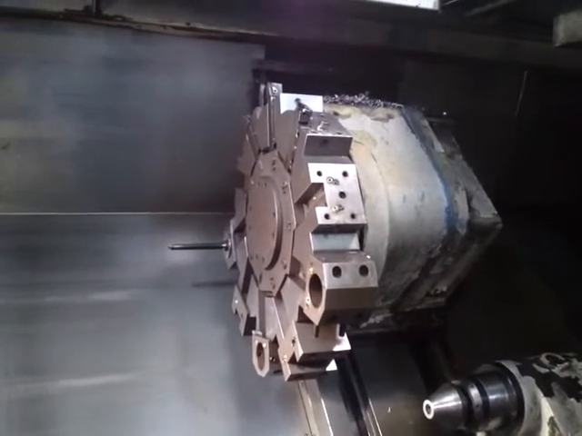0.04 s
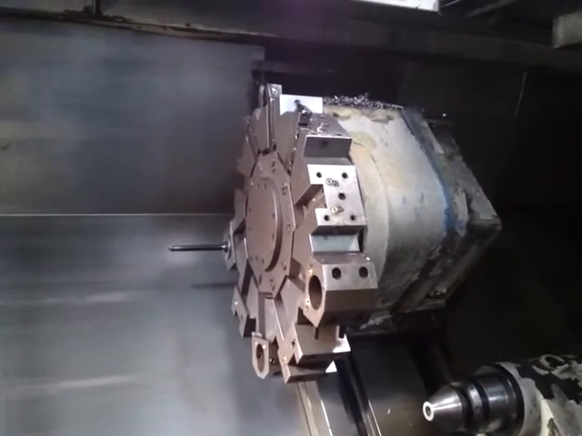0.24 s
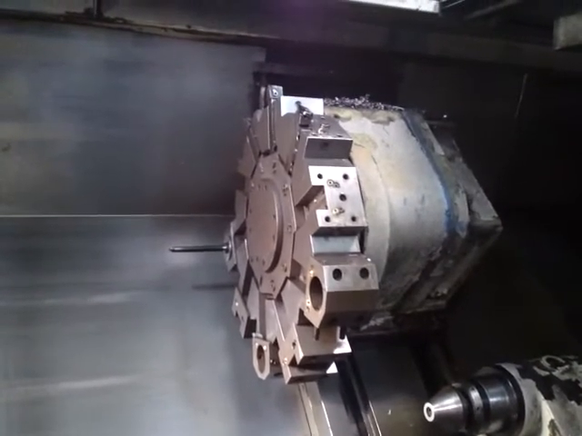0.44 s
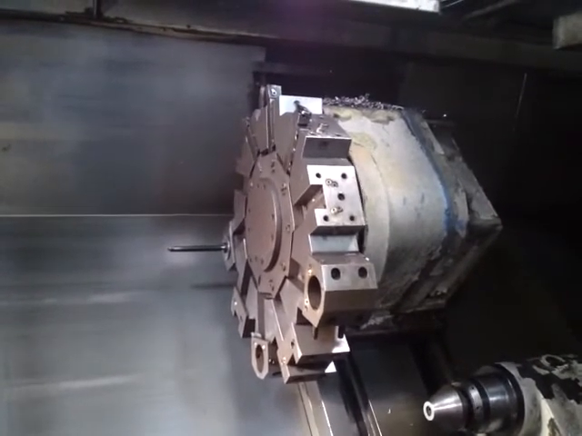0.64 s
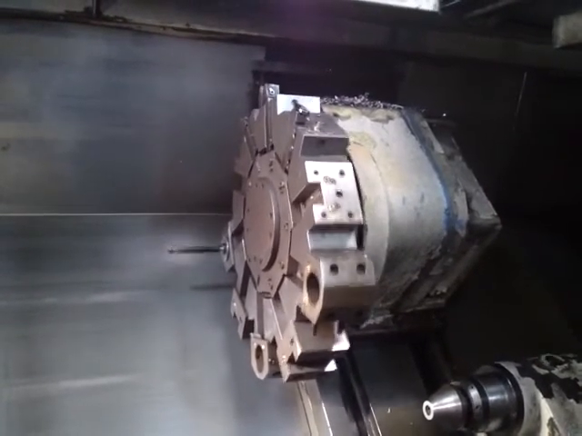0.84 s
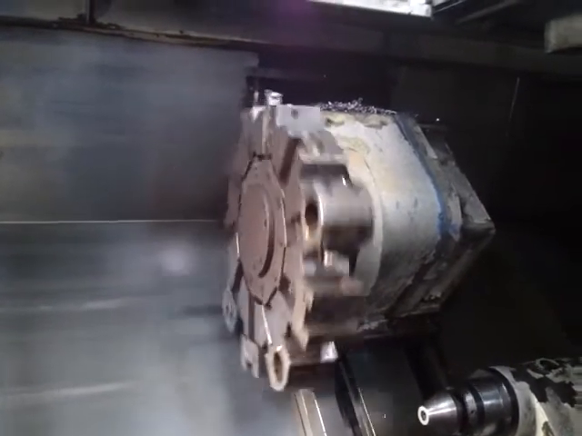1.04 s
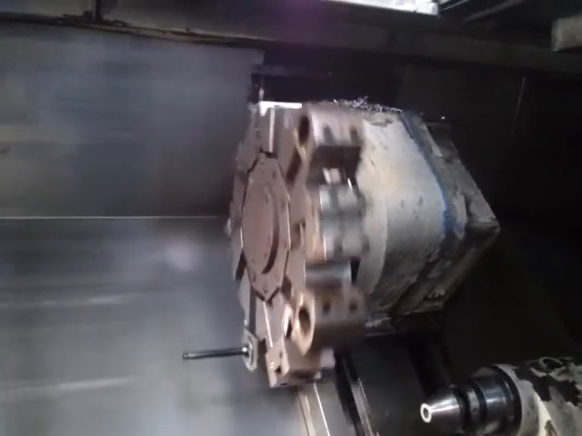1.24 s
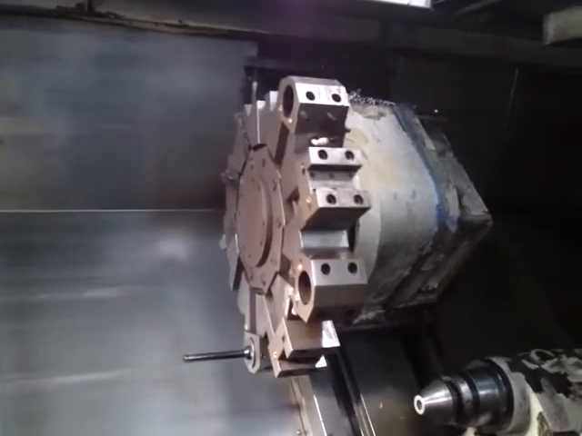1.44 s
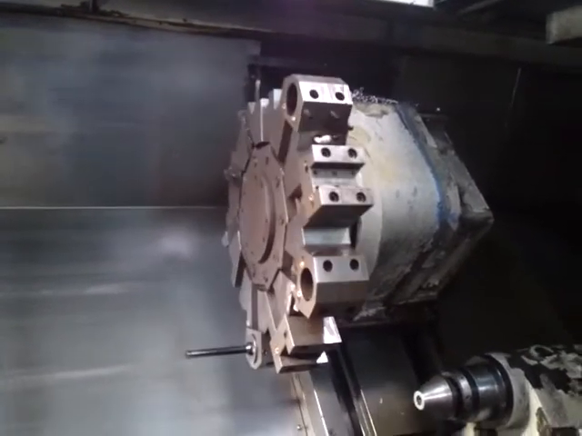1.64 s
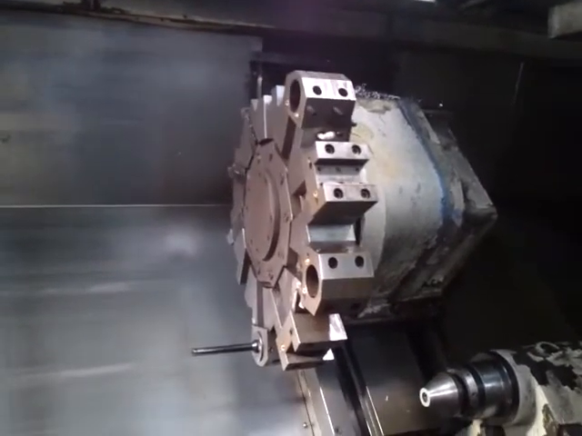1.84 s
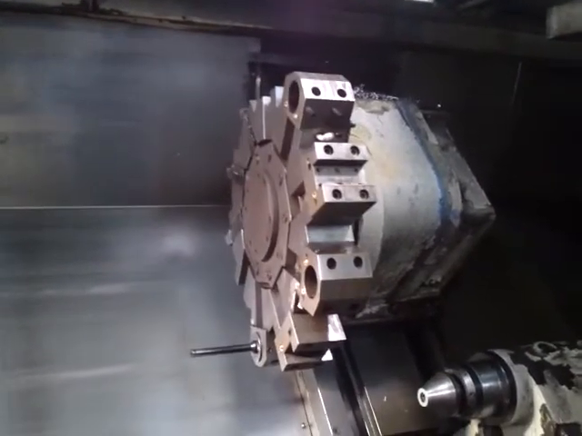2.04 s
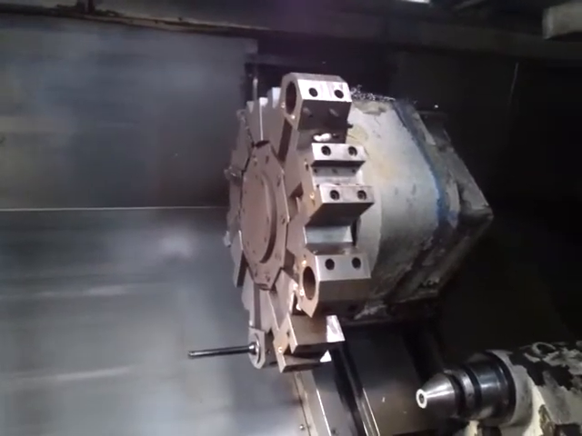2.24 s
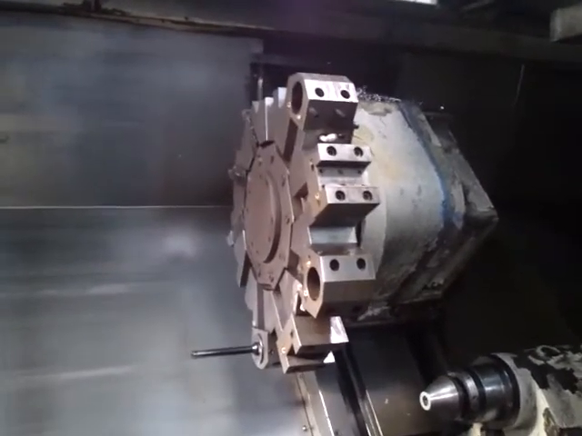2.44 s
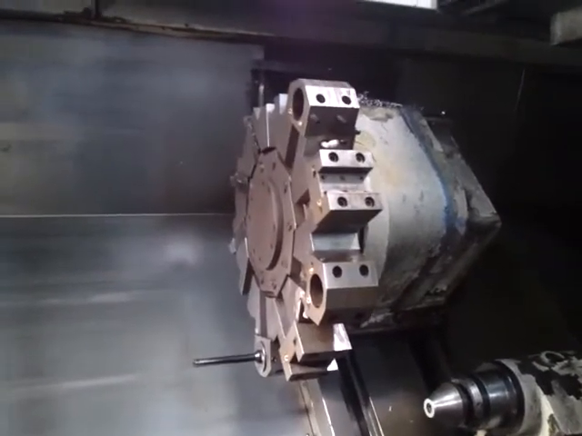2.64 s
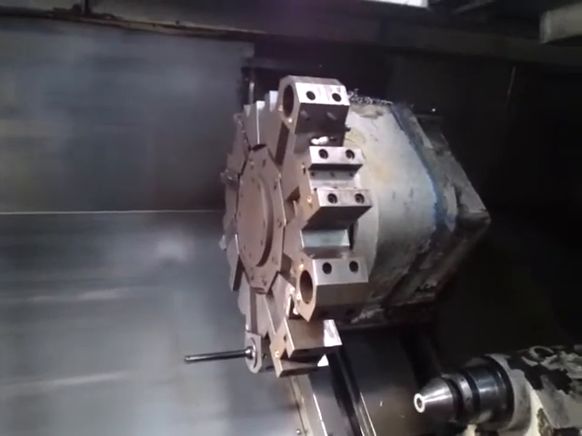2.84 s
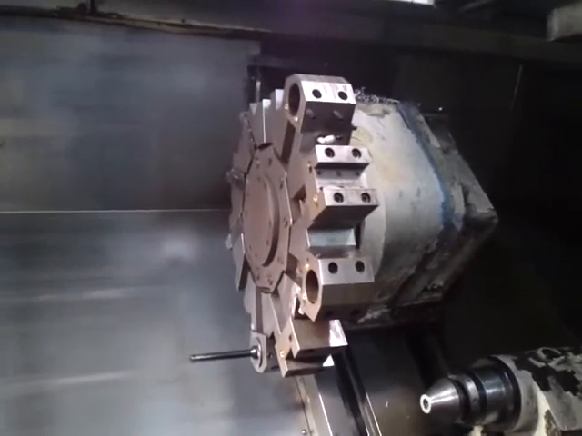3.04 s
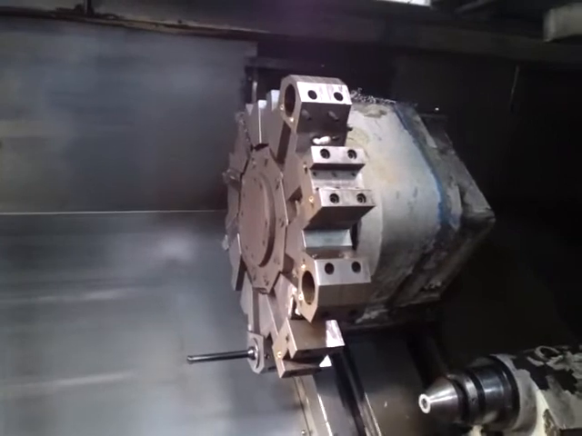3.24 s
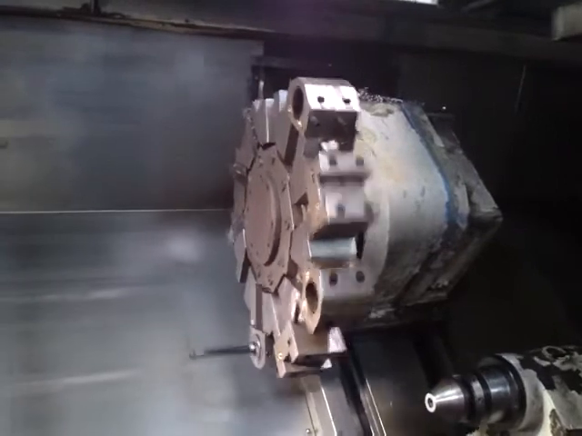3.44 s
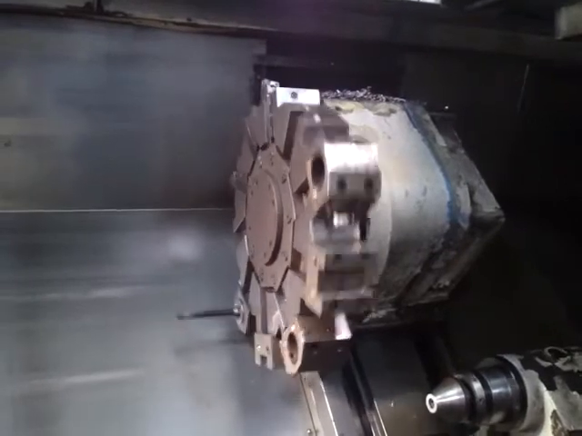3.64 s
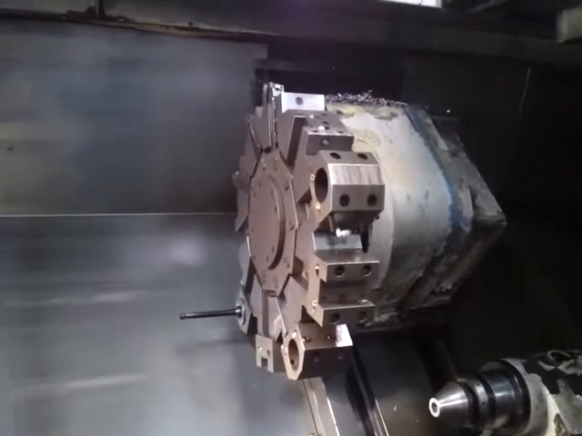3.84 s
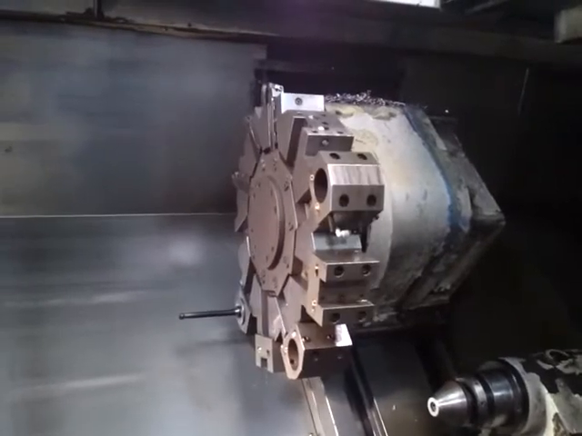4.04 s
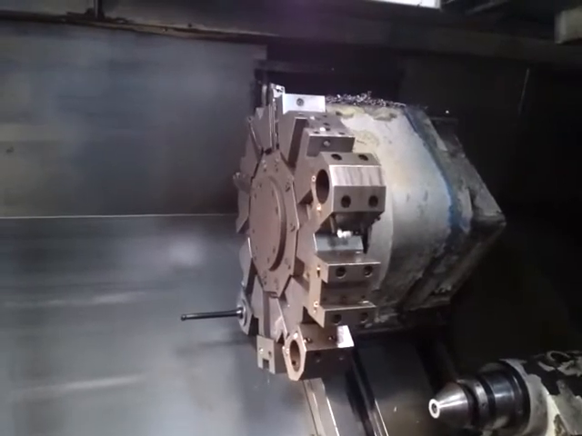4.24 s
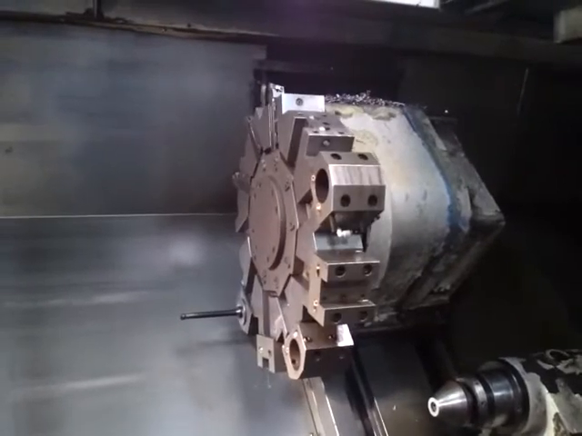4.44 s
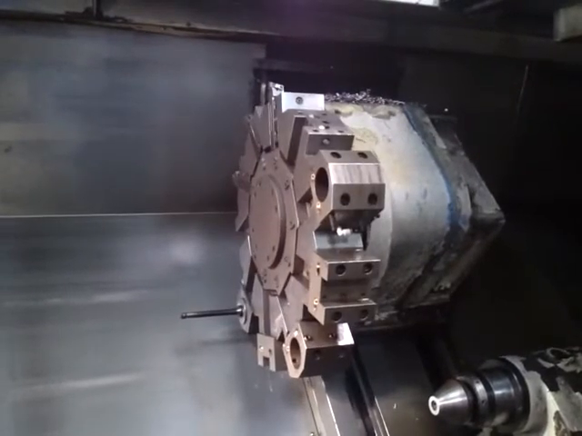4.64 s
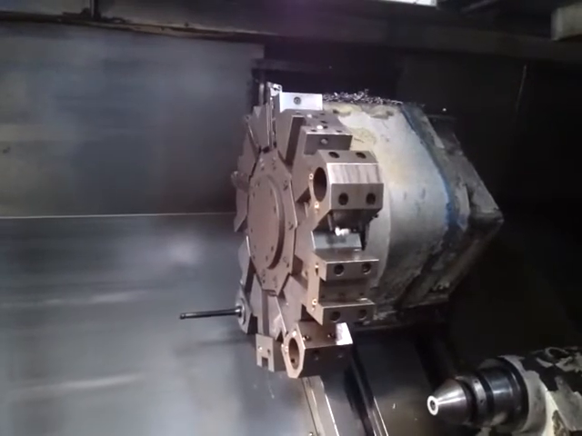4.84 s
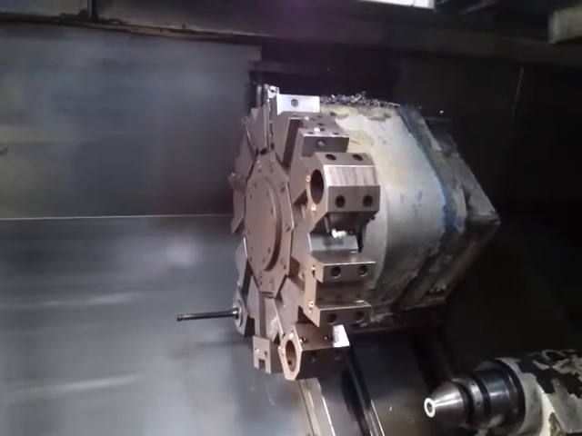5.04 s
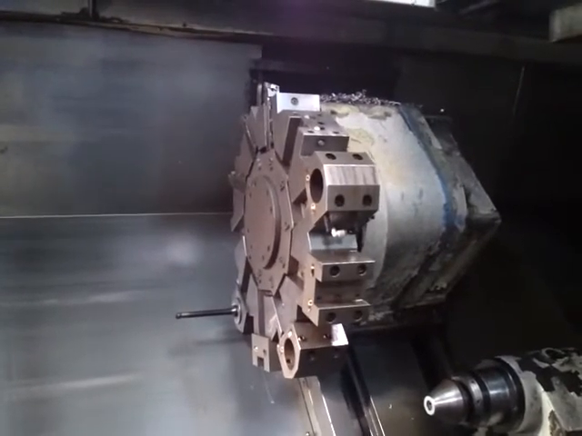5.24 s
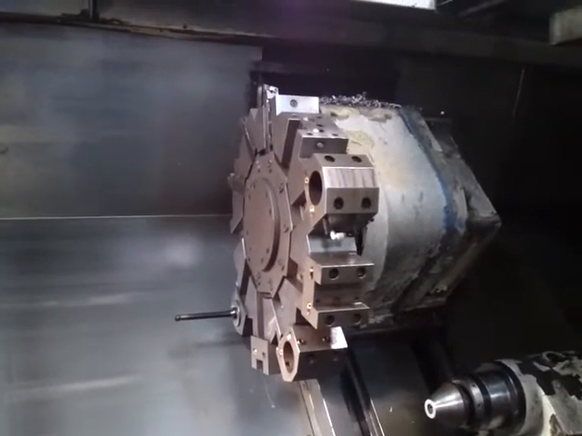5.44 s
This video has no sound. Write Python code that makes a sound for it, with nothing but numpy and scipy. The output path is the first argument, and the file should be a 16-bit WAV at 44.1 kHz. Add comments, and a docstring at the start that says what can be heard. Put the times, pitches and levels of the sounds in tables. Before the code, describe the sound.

An idling lathe heard close at its open door: a steady pump hum around 245 hertz, wavering motor tones, a broad fan rush and faint droning, whistling panels run throughout. At about 0.4 s the turret unclamps with a loud ringing steel clunk, low thud, bright valve spit and short squeaks. Oil hisses until a duller piston knock near 0.77 s. From 0.9 to 1.4 s the heavy disc swings with a soft gear whirr and the pump slightly louder. At 1.4 s a valve snaps and spits, and high oil noise sings until about 2.05 s. A small bright tick and squeak come at 2.64 s. A second clunk at 2.96 s leads to hiss, a bright knock at 3.35 s, a shorter whirr, a brake hiss at 3.6 s and clamping hiss from 3.7 to 4.35 s. A third clunk at 5.07 s hisses to a knock around 5.45 s. Tails are short and dense; mono, no top treble.

```python
"""A CNC lathe idles, heard at the open door: hydraulic pump hum, motor tones and a rush of fans run throughout.
Index: the turret unclamps with a clunk (dense noise over ringing steel modes), a valve spit and squeaks;
oil hisses until the piston knocks on its stop, the disc swings on a whirring servo (noise under a gain ramp),
then the valve snaps and spits, and oil sings in moving noise bands as the turret clamps. Small bright bursts
fall between. A second index follows; a third gets as far as the knock. Every blow has a short, dense tail."""
import sys
import numpy as np
from scipy import signal
from scipy.fft import rfft, irfft, next_fast_len
from scipy.io import wavfile

SR = 44100
rng = np.random.default_rng(int(sys.argv[2]) if len(sys.argv) > 2 else 0)


def pcm_store(signal):
    """Save signal as 16-bit PCM."""
    levels = np.round(np.clip(np.atleast_2d(signal), -1, 1) * 32767)
    wavfile.write(sys.argv[1], SR, levels.astype(np.int16).T)


N = 242991
T = np.arange(N) / SR

# disc swings to the next tool: [start t/s, length/s, whirr level/dB]
SWINGS = [(0.876, 0.49, -33.5), (3.356, .2, -34)]


def amp(db):
    """Decibels to gain."""
    return 10 ** (np.asarray(db) / 20)


def unit(x):
    """Scales to rms 1."""
    return x / np.sqrt(np.mean(x ** 2) + 1e-20)


def coloured(x, colour):
    """Shapes the spectrum of x by (f/Hz, relative level/dB) points, linear in log f; rms 1."""
    points_hz, points_db = np.transpose(colour)
    f_hz = np.fft.rfftfreq(len(x), 1 / SR)
    gain_db = np.interp(np.log(f_hz + 1), np.log(points_hz), points_db)
    return unit(irfft(rfft(x) * amp(gain_db), len(x)))


def noise(colour):
    """Steady noise of a given colour."""
    return coloured(rng.standard_normal(next_fast_len(N)), colour)[:N]


def band(hz, width_hz, size=next_fast_len(N)):
    """Noise in one steep-sided resonance: a slow complex flutter carried by a tone that may glide; rms 1."""
    f_hz = np.fft.fftfreq(size, 1 / SR)
    real, imag = rng.standard_normal((2, size))
    skirt = (1 + (f_hz / (0.73 * width_hz)) ** 2) ** 2
    flutter = np.fft.ifft((real + 1j * imag) / skirt)[:N]
    turns = np.cumsum(hz * np.ones(len(flutter))) / SR
    return unit((flutter * np.exp(2j * np.pi * turns)).real)


def wander(rate_hz):
    """Random drift of rms 1: straight lines between rate_hz random knots per second."""
    knots_s = np.arange(0, T[-1] + 1, 1 / rate_hz)
    return unit(np.interp(T, knots_s, rng.standard_normal(len(knots_s))))


def add(mix, start_s, sound):
    """Mixes a sound in at start_s, cut at the end of the mix."""
    part = mix[max(round(start_s * SR), 0):][:len(sound)]
    part += sound[:len(part)]


def stroke(start_s, length_s, rise_s, t60_s):
    """Gain of a movement: linear start-up, hold until length_s, exponential decay."""
    rise = np.clip((T - start_s) / rise_s, 0, 1)
    return rise * amp(-60 * np.maximum(T - start_s - length_s, 0) / t60_s)


def swing_gain(start_s, length_s):
    """Servo spins the disc up, holds and brakes; drives both pump load and whirr."""
    return stroke(start_s, length_s, rise_s=0.088, t60_s=0.35)


def hum(pump_waver=0.1, tone_waver=0.39, drift=0.000716):
    """Pump vane-passing tone, louder while the disc swings, and motor tones; level and speed waver."""
    # steady tones of motors, fans and transformer: [f/Hz, level/dB]
    motor_tones = [(50.6, -44), (101.1, -44.5), (109.5, -47), (120.0, -43), (276.5, -43), (505.9, -43.5),
                   (552.9, -43), (803.8, -46), (829.6, -49.5), (987.8, -50.5), (994.6, -47),
                   (1079.3, -53.5), (1193.3, -61), (1339.8, -48.5), (1470.9, -52), (1935.5, -50.5),
                   (2375.1, -50.5), (2760.0, -53.5), (3977.5, -51.5)]
    pump_hz, pump_db, load_db = 245.1, -29.5, 2

    def tone(hz, db, waver):
        turns = np.cumsum(hz * (1 + drift * wander(2))) / SR + rng.random()
        return amp(db) * unit((1 + waver * wander(10)) * np.sin(2 * np.pi * turns))

    load = sum(swing_gain(start_s, length_s) for start_s, length_s, _ in SWINGS)
    pump = tone(pump_hz, pump_db + load_db * load, pump_waver)
    return pump + sum(tone(hz, db, tone_waver) for hz, db in motor_tones)


def fans(flutter_db=0.65):
    """Broad rush of air and oil plus narrow resonances, sharing one slight level flutter."""
    # rush of the fans and the running pump: [f/Hz, relative level per Hz/dB]
    rush_colour = [(12, -18.5), (32, -8.5), (65, -11), (100, -9.5), (150, -6.5), (215, -6), (255, 1.5),
                   (300, -7), (550, -5.5), (700, -7.5), (1400, -12), (2700, -18.5), (4800, -19),
                   (5900, -16), (6700, -16.5), (7300, -27.5)]
    # panels and ducts that drone or whistle: [f/Hz, width/Hz, level/dB]
    drone_bands = [(146.1, 16, -42.5), (198.6, 16, -49.5), (332.5, 16, -43.5), (377.4, 22, -41.5),
                   (535, 9.4, -43), (599, 22, -45.5), (3750, 18, -56.5), (5350, 14, -52), (5650, 30, -51),
                   (6164, 14, -50.5), (6500, 20, -53.5), (6570, 40, -55.5), (7000, 70, -49.5)]
    rush_db = -26.5
    drones = sum(amp(db) * band(hz, width_hz) for hz, width_hz, db in drone_bands)
    return amp(flutter_db * wander(20)) * (amp(rush_db) * noise(rush_colour) + drones)


def blow(start_s, db, colour, rise_s, t60_s, grain_db, ring_db, hold_s=0, rattle_db=0.94):
    """Dense clatter of reflections that swells, holds and dies over ringing steel modes; cut at 0.5 s."""
    # modes of the turret and its guards: [f/Hz, relative level/dB, t60/s]
    steel_modes = [(835, 0, .3), (1040, -2, .3), (1530, -4, .22), (1790, -3, .22), (2520, -3, .18),
                   (3230, -7, .18), (3757, -2, .18), (5960, -1, .15), (6750, 2, .15)]
    out, t = np.zeros(N), np.arange(SR // 2) / SR
    sizes = amp(grain_db * np.minimum(rng.exponential(1, len(t)), 4))  # a few reflections stand out
    clatter = coloured(sizes * rng.standard_normal(len(t)), colour)
    ring = np.zeros(len(t))
    for hz, mode_db, mode_t60_s in steel_modes:
        ring += amp(mode_db - 60 * t / mode_t60_s) * np.sin(2 * np.pi * (hz * t + rng.random()))
    swell = np.minimum(t / max(rise_s, 1e-4), 1)
    fade = amp(-60 * np.maximum(t - rise_s - hold_s, 0) / t60_s)
    rattle = amp(rattle_db * wander(250)[:len(t)])  # loose parts
    add(out, start_s, amp(db) * swell * rattle * (clatter * fade + amp(ring_db) * ring))
    return out


def unclamp(start_s, spit_db, clunk_db, thud_db, hiss_db, knock_db, stop_thud_db):
    """Coupling clunks free, valve spits, oil hisses until the piston knocks on its stop; the disc thuds."""
    # clunk of the coupling: [f/Hz, relative level per Hz/dB]
    clunk_colour = [(150, -15), (400, -1.5), (620, -6.5), (860, -5), (1250, -5), (1680, 0), (2100, -8),
                    (2600, -6), (3400, -9.5), (5000, -9), (7000, -14)]
    # spit of the valve opening to unclamp: [f/Hz, relative level per Hz/dB]
    release_colour = [(800, -28), (2000, -18), (3400, 1), (4800, -4.5), (5650, 4), (6300, 3.5), (6800, 7),
                      (7100, 1.5), (7500, -14.5)]
    # oil hiss during piston travel: [f/Hz, relative level per Hz/dB]
    hiss_colour = [(1500, -11.5), (3000, -12.5), (4700, -5.5), (5400, -3.5), (6200, 0.5), (6800, 0),
                   (7400, -10)]
    # knock of the piston on its stop: [f/Hz, relative level per Hz/dB]
    knock_colour = [(150, -8), (400, -0.5), (560, 5), (750, -1.5), (1050, 4.5), (1480, 0), (2000, -6.5),
                    (3500, -13), (4150, -7), (5100, -14.5), (6200, -12), (7400, -30)]
    clunk_lead_s, travel_s = 0.012, 0.389
    stop_s = start_s + travel_s
    clunk = blow(start_s - clunk_lead_s, clunk_db, clunk_colour, rise_s=0.008, t60_s=0.49,
                 grain_db=3.0, ring_db=-9, hold_s=0.005)
    spit = blow(start_s, spit_db, release_colour, rise_s=0.0079, t60_s=0.2,
                grain_db=2.6, ring_db=-16, hold_s=0.002)
    flow = amp(hiss_db) * stroke(start_s, travel_s, rise_s=0.055, t60_s=0.4)
    hiss = flow * sputter(noise(hiss_colour))
    knock = blow(stop_s, knock_db, knock_colour, rise_s=0.011, t60_s=0.41, grain_db=2.0, ring_db=-25)
    thuds = thud(start_s, thud_db) + thud(stop_s, stop_thud_db)
    return clunk + spit + chirp(start_s, spit_db) + hiss + knock + thuds


def sputter(x, depth_db=0.85):
    """Uneven oil flow: random level flutter."""
    return x * amp(depth_db * wander(80))


def squeak(start_s, hz, width_hz, db, t60_s, rise_s=0.002):
    """Brief fuzzy whistle: one noise band with a fast rise and exponential decay."""
    out, t = np.zeros(N), np.arange(SR // 2) / SR
    gain = np.minimum(t / rise_s, 1) * amp(db - 60 * t / t60_s)
    add(out, start_s, gain * band(hz, width_hz, size=len(t)))
    return out


def chirps_and_squeaks():
    """Valve chirps and brief squeaks, mostly close to a blow."""
    # chirps and squeaks: [t/s, f/Hz, width/Hz, level/dB, t60/s]
    squeak_events = [(.385, 5570, 650, -20, 0.15), (.409, 5740, 550, -23.5, 0.26),
                     (1.112, 4030, 400, -36, .2), (2.643, 3400, 500, -31.5, .1),
                     (3.354, 4310, 900, -27, 0.21)]
    return sum(squeak(*row) for row in squeak_events)


def chirp(spit_s, spit_db):
    """Valve whistles briefly as its spool shifts, just after the spit starts."""
    lag_s, relative_db = 0.0097, -10.5
    return squeak(spit_s + lag_s, hz=6700, width_hz=300, db=spit_db + relative_db, t60_s=0.12)


def thud(jolt_s, db):
    """Heavy disc lurches on its slide shortly after a jolt."""
    # thud of the disc: [f/Hz, relative level per Hz/dB]
    thud_colour = [(40, -16), (80, -2), (130, -1.5), (210, 1), (380, -8), (700, -31.5)]
    lurch_s = 0.025
    return blow(jolt_s + lurch_s, db, thud_colour, rise_s=0.02, t60_s=0.55, grain_db=1.2, ring_db=-30.0)


def servo():
    """Soft whirr of the gears while the disc swings: noise under the swing gain."""
    # whirr of the servo gears: [f/Hz, relative level per Hz/dB]
    whirr_colour = [(60, -6.5), (150, -12.5), (350, -5), (540, 8), (750, -5), (1400, 0), (3000, -11.5)]
    gain = sum(amp(db) * swing_gain(start_s, length_s) for start_s, length_s, db in SWINGS)
    return noise(whirr_colour) * gain


def bright_bursts():
    """Small bright bursts in the turret: light ticks, the top of a stop knock, a brake hiss."""
    # bursts: [t/s, level/dB, rise/s, t60/s]
    burst_events = [(1.099, -36, .003, 0.26), (2.642, -27, 0.0009, .07), (3.35, -26, .006, .17),
                    (3.605, -26.5, .008, 0.51)]
    # burst spectrum: [f/Hz, relative level per Hz/dB]
    burst_colour = [(1500, -8), (3300, -0.5), (4300, -2.5), (5200, 2.5), (6400, 7), (7400, -6.5)]
    return sum(blow(start_s, db, burst_colour, rise_s, t60_s, grain_db=2.5, ring_db=-26)
               for start_s, db, rise_s, t60_s in burst_events)


def clamp(start_s, spit_db, song_db, build_s=0.21):
    """Valve snaps over and spits; oil sings in its resonances, which shift as pressure builds up."""
    # snap of the spool on its seat: [f/Hz, relative level per Hz/dB]
    snap_colour = [(2000, -26), (3300, -2), (4600, 6), (5600, -2), (7400, -6)]
    # spit of the valve opening to clamp: [f/Hz, relative level per Hz/dB]
    clamp_colour = [(300, -14), (1200, -4), (2600, -8.5), (3500, 3), (4800, -1), (5600, 3), (6300, 5),
                    (6800, 7), (7400, -10.5)]
    # valve resonances: [f/Hz, width/Hz, glide/(Hz/s), initial level/dB, level at full pressure/dB]
    valve_bands = [(3380, 440, -0.5, -11, -16), (5300, 260, 100, -17, -6.5), (5500, 600, -0.5, -15, -12.5),
                   (6300, 520, 0, -11, -9), (6820, 330, -300, -7.5, -3), (7180, 300, -0.5, -16, -16)]
    snap_db, length_s = -23.5, 0.65
    sag_db_per_s = -4.5  # flow eases as the piston seats
    snap = blow(start_s, snap_db, snap_colour, rise_s=0.0008, t60_s=0.15,
                grain_db=1.6, ring_db=-26, hold_s=0.003)
    spit = blow(start_s, spit_db, clamp_colour, rise_s=0.0016, t60_s=0.36,
                grain_db=1.4, ring_db=-15.5, hold_s=0.0083)
    since_s = np.clip(T - start_s, 0, length_s)
    pressure = np.minimum(since_s / build_s, 1)
    song = np.zeros(N)
    for hz, width_hz, glide_hz_per_s, first_db, later_db in valve_bands:
        level_db = first_db + (later_db - first_db) * pressure
        song += amp(level_db) * band(hz + glide_hz_per_s * since_s, width_hz)
    flow = amp(song_db + sag_db_per_s * since_s) * stroke(start_s, length_s, rise_s=0.06, t60_s=0.18)
    return snap + spit + chirp(start_s, spit_db) + flow * sputter(song)


def turret():
    """Indexing cycle: unclamp, swing, clamp, with chirps, squeaks and bright bursts."""
    # unclampings: [t/s, valve spit/dB, clunk/dB, disc thud/dB, oil hiss/dB, stop knock/dB, stop thud/dB]
    unclamp_events = [(.377, -16.5, -18.5, -20.5, -32.5, -21, -27),
                      (2.961, -17, -18, -29.5, -31, -24.5, -33),
                      (5.066, -17.5, -19.3, -32, -29.5, -21.5, -41)]
    # clampings: [t/s, valve spit level/dB, oil song level/dB]
    clamp_events = [(1.388, -20.5, -30), (3.692, -18, -28.5)]
    unclamping = sum(unclamp(*row) for row in unclamp_events)
    clamping = sum(clamp(*row) for row in clamp_events)
    return unclamping + chirps_and_squeaks() + servo() + bright_bursts() + clamping


def scene():
    """Sums all sources to mono, the same in both channels."""
    mono = hum() + fans() + turret()
    return np.array([mono, mono])


def record(dry):
    """Band limit: steep linear-phase low-pass."""
    edge_hz = 7520
    low_pass = signal.firwin(601, edge_hz, window=("kaiser", 9), fs=SR)
    return signal.oaconvolve(dry, low_pass[None], "same")


dry = scene()
out = record(dry)
pcm_store(out)
```